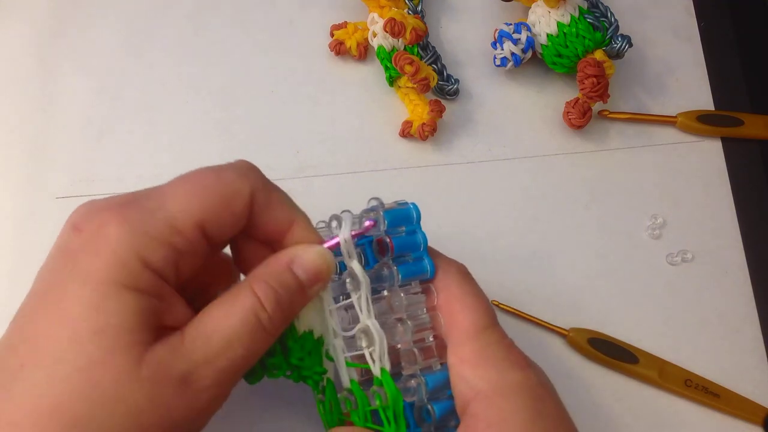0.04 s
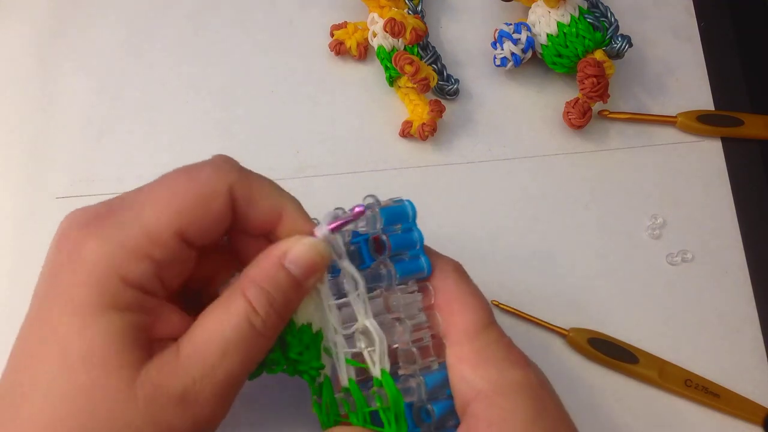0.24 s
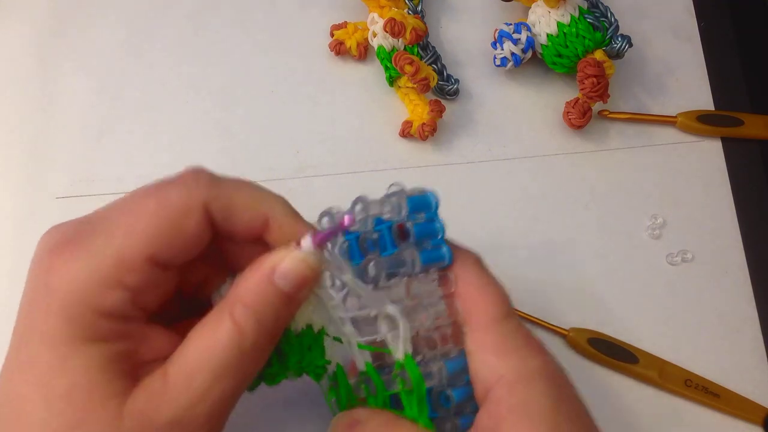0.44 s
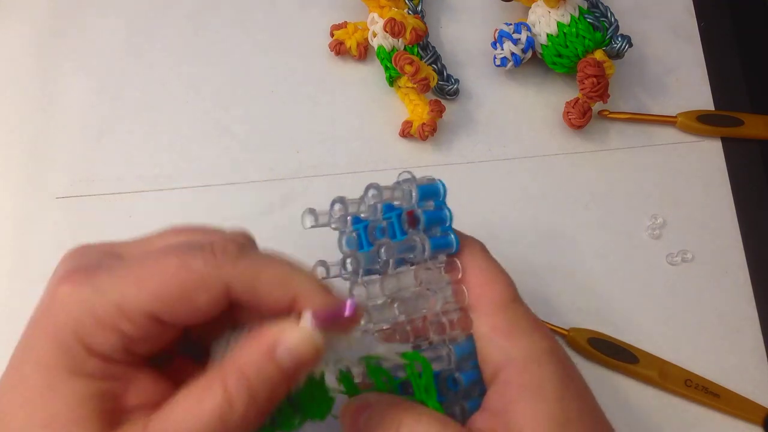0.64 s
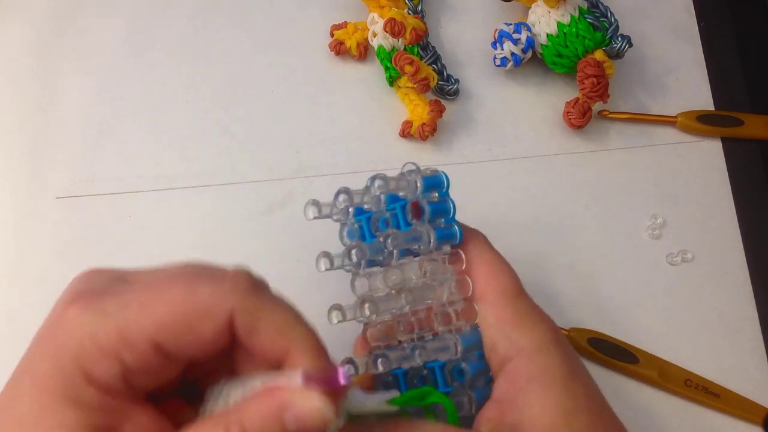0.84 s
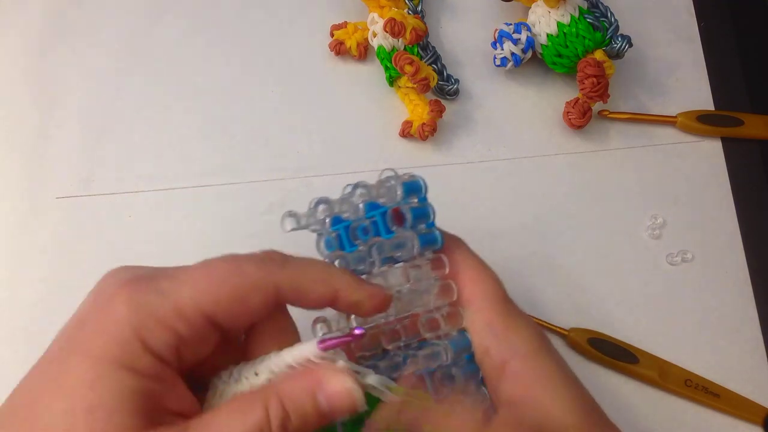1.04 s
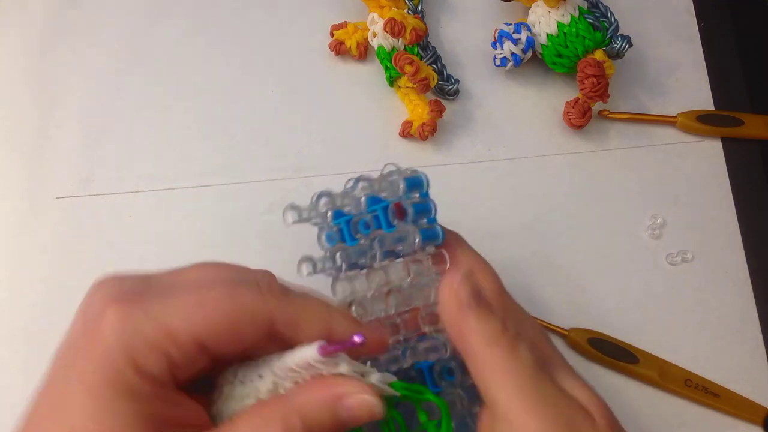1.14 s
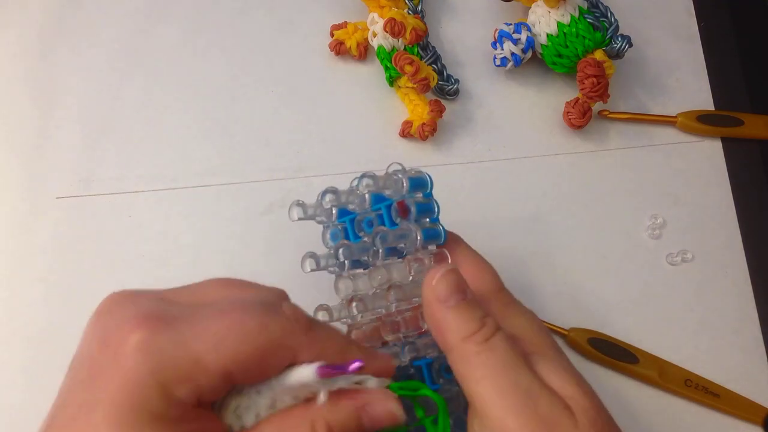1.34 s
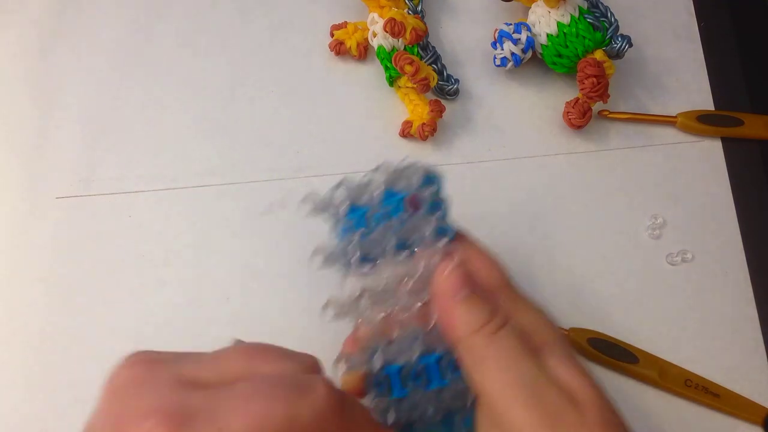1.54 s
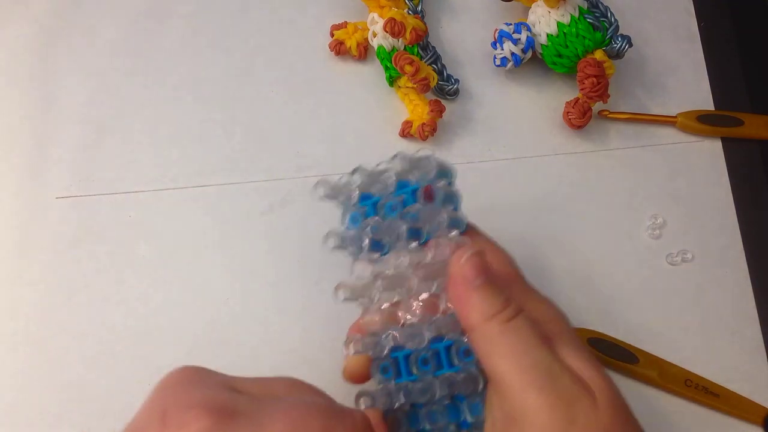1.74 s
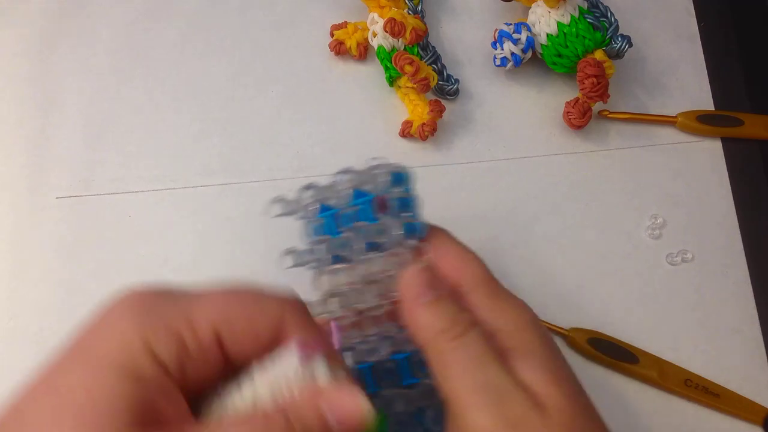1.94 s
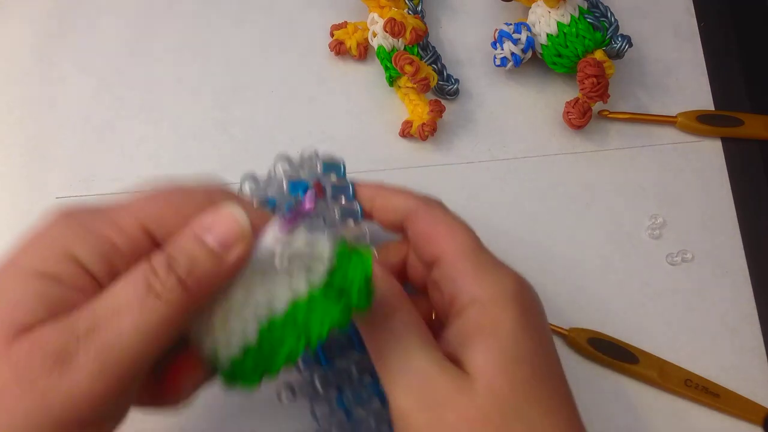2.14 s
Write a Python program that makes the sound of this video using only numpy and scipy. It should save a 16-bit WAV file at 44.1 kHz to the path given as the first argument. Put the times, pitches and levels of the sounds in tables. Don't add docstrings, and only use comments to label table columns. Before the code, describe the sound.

Rubber bands snap off plastic loom pegs in sharp clicking bursts, close up in a quiet room

```python
import sys
import numpy as np
from scipy import signal
from scipy.fft import rfft, irfft
from scipy.io import wavfile
from scipy.ndimage import uniform_filter1d

SR = 44100
rng = np.random.default_rng(int(sys.argv[2]) if len(sys.argv) > 2 else 0)


def inscribe(sig):
    pcm = np.round(np.clip(np.atleast_2d(sig).T, -1, 1) * 32767)
    wavfile.write(sys.argv[1], SR, pcm.astype(np.int16))


def how_loud(loudness_db):
    steps = np.asarray(loudness_db, float) / 20
    return 10 ** steps


N = 96623


def unit(x):
    return x / np.max(np.abs(x))


def level(x, db):
    return x * how_loud(db) / np.sqrt(np.mean(x ** 2))


def band(x, lo_hz, hi_hz):
    edges_hz = [lo_hz, min(hi_hz, 0.45 * SR)]
    return signal.sosfilt(signal.butter(2, edges_hz, "band", fs=SR, output="sos"), x)


def fade(t, t60):
    return np.exp(-np.log(1000) * t / t60)


def rise(t, rise_s):
    return 1 - np.exp(-t / rise_s)


def walk(rate_hz):
    k = int(SR / rate_hz)
    steps = np.repeat(rng.standard_normal(N // k + 1), k)
    sway = uniform_filter1d(uniform_filter1d(steps, k), k)[:N]
    return sway / sway.std()


def add(out, x, start_s):
    i = int(start_s * SR)
    out[i:i + len(x)] += x[:N - i]


def even(x):
    spectrum = rfft(x, 2 * len(x))
    return irfft(spectrum / uniform_filter1d(np.abs(spectrum), size=11))[:len(x)]


def hiss_and_rumble():
    # frequency in Hz, level in dB per Hz.
    floor = np.array([(15, -17), (25, -2), (126, 0.5), (240, -9.5), (509, -10), (804, -17), (945, -17),
                      (2230, -21), (15500, -24.5)])
    hz = np.fft.rfftfreq(N, 1 / SR)
    colour = how_loud(np.interp(np.log(hz + 1), np.log(floor[:, 0]), floor[:, 1], left=-60))
    noise = level(irfft(rfft(rng.standard_normal(N)) * colour, N), -60.5)
    rumble = band(noise, 9.6, 470)
    return noise + rumble * (how_loud(1.5 * walk(24)) - 1)


def whine():
    centre_hz, width_hz = 348.7, 10.8
    narrow = band(rng.standard_normal(N), centre_hz - width_hz / 2, centre_hz + width_hz / 2)
    return level(narrow, -71)


def rustle():
    # time in seconds, level in dB.
    shuffle = [
        (0, -71),
        (.45, -67),
        (.9, -64),
        (1.3, -70),
        (1.601, -69),
        (1.88, -69.5),
        (2.0, -59),
        (2.19, -61),
    ]
    rub = level(band(rng.standard_normal(N) ** 3, 1900, 9400), 0) * how_loud(2 * walk(65))
    return rub * how_loud(np.interp(np.arange(N) / SR, *np.array(shuffle).T))


def room(x):
    t = np.arange(SR // 3) / SR
    top_hz = 6500
    tail = 0
    for db, t60_s in [(-24, 0.35), (-21.5, 0.28)]:
        noise = rng.standard_normal(len(t))
        dulled = band(noise, 200, top_hz) + how_loud(-4) * band(noise, top_hz, 21000)
        part = dulled * rise(t, 0.0012) * fade(t, t60_s)
        tail = tail + how_loud(db) * part / np.linalg.norm(part)
    return signal.fftconvolve(x, tail)[:N]


def table_and_body():
    # start in seconds, peak in dB,
    # pitch in Hz, t60 in seconds.
    thumps = [(0.296, -34, 164, 0.051), (0.322, -36, 113, 0.037), (.336, -35, 118, 0.059),
              (0.359, -37, 103, 0.046), (0.383, -38.5, 132, 0.022), (.547, -46.5, 590, 0.056),
              (.571, -41, 568, 0.028), (0.653, -39, 596, 0.034), (.721, -39, 584, 0.024),
              (.843, -35.5, 486, 0.0096), (1.275, -52.5, 520, 0.012), (1.519, -33, 490, 0.0083),
              (1.52, -37.5, 247, 0.016), (.293, -47.5, 515, 0.018), (0.367, -38.5, 350, 0.036),
              (0.571, -29.5, 90, 0.051), (.574, -37, 191, 0.032), (0.723, -32.5, 89, 0.048),
              (.735, -44.5, 174, 0.14), (.795, -50, 159, 0.055), (0.844, -46.5, 156, 0.078),
              (.995, -51.5, 126, 0.11), (1.173, -46.5, 94, 0.035), (1.491, -46, 87.8, 0.23),
              (1.519, -42.5, 87.7, 0.073), (1.77, -43.5, 69.6, 0.028), (1.812, -46.5, 85, 0.044),
              (1.9551, -19, 97.5, 0.026), (1.9562, -28.5, 161, .018), (1.985, -43.5, 195, 0.022),
              (2.029, -42, 89, 0.029), (2.05, -49.5, 96, 0.045), (1.973, -38.5, 360, 0.023),
              (1.979, -35, 79, 0.071), (2, -31, 79.5, 0.05), (2.031, -47, 508, 0.037),
              (1.954, -41, 540, 0.04), (0.657, -43, 160, 0.15), (0.5706, -36.5, 357, 0.021),
              (.488, -50, 162, 0.07), (1.974, -35.5, 110, 0.036), (.362, -41, 526, 0.024),
              (1.998, -52, 480, 0.14)]
    sag, sag_s = 0.29, 0.0035
    out, t = np.zeros(N), np.arange(SR // 4) / SR
    for start, db, hz, t60 in thumps:
        grit = unit(band(rng.standard_normal(len(t)), 110, 428))
        low = hz < 300
        turns = hz * (t + low * sag * sag_s * rise(t, sag_s))
        body = (np.sin(2 * np.pi * turns) + how_loud(-20.5) * 3 * grit) * fade(t, t60)
        overtone = how_loud(-10) * np.sin(2 * np.pi * 1.6 * turns) * fade(t, t60 / 2)
        thump = (body + low * overtone) * rise(t, 0.005) ** (1 + low)
        add(out, how_loud(db) * unit(thump), start)
    return band(out, 30, 4400)


def clear_notes():
    # start in seconds, peak in dB, pitch in Hz, t60 in seconds.
    clear = [(0.5692, -37.5, 5870, 0.086), (.5709, -15, 5940, 0.0072), (0.571, -17.5, 6500, .006),
             (0.57, -30.5, 3093, 0.023), (.6538, -24.5, 3750, 0.012), (0.6548, -27.5, 4940, 0.0045),
             (.7225, -30.5, 3670, 0.012), (0.7233, -25, 4660, 0.0056), (.7915, -41, 3760, 0.0062),
             (.843, -30, 2390, 0.013), (.843, -32.5, 3800, 0.015), (1.1705, -43, 1920, 0.033),
             (2.0235, -35, 4100, 0.014), (1.483, -23, 4880, 0.015), (0.368, -57, 5860, 0.046),
             (.349, -35, 4350, 0.034), (.6538, -24.5, 2200, 0.011), (0.7237, -24.5, 2258, 0.006),
             (0.7211, -25, 1590, 0.017), (0.7226, -31, 1276, 0.041), (.7922, -30, 2040, 0.017),
             (0.843, -31, 1670, 0.017), (1.1075, -43.5, 1734, 0.027), (1.274, -53.5, 1010, 0.016),
             (1.2751, -48.5, 1400, 0.0073), (1.2737, -53.5, 1900, 0.015), (1.5195, -24, 2320, 0.0058),
             (1.7222, -43.5, 4090, 0.014), (1.7657, -40.5, 1660, 0.036), (1.7669, -27, 3930, 0.013),
             (1.806, -40, 2230, 0.019), (2.031, -44, 2060, 0.023), (2.1073, -32, 4030, 0.012),
             (1.494, -27.5, 3960, 0.034), (1.496, -27, 5340, 0.011)]
    out, t = np.zeros(N), np.arange(SR // 8) / SR
    for start, db, hz, t60 in clear:
        rough = unit(band(rng.standard_normal(len(t)), 0.985 * hz, 1.032 * hz))
        tone = np.sin(2 * np.pi * hz * t) + 3 * 0.13 * rough
        add(out, how_loud(db) * unit(tone * fade(t, t60) * rise(t, 0.00035) ** 2), start)
    return out


def ring(t, modes):
    scatter_db, detune = 2.5, 0.04
    total = np.zeros(len(t))
    for hz, db, t60 in modes:
        a, b = rng.standard_normal(2)
        total += how_loud(db + scatter_db * a) * np.sin(2 * np.pi * hz * (1 + detune * b) * t) * fade(t, t60)
    return total


def peg_ring(t, peg_hz):
    # frequency in Hz, level in dB, t60 in seconds.
    pegs = [(3155, -11, .008), (3750, -6, .01), (4300, -4, .01), (4900, -4, .01), (5400, -4, .01),
            (5870, -4, .014), (6300, -5, .01), (7000, -7, .008)]
    struck = how_loud(4) * np.sin(2 * np.pi * peg_hz * t) * fade(t, 0.011)
    return band(struck + ring(t, pegs), 3410, 7310)


def frame_ring(t):
    # frequency in Hz, level in dB, t60 in seconds.
    frame_modes = [(950, -22, .015), (1303, -14, .02), (1600, -5, .026), (1780, -2, .026), (2000, 0, .028),
                   (2280, 0, .028), (2500, -4, .02)]
    return band(ring(t, frame_modes) * fade(t, 0.17), 1370, 6000)


def air_crack(t):
    dying = fade(t, 0.0023)
    hiss = unit(band(rng.standard_normal(len(t)) * dying, 7000, 14140))
    return hiss + 0.3 * np.sin(2 * np.pi * 14200 * t) * dying


def rattle(t, peg_hz, peg_gain, frame_gain, air_gain):
    # low edge in Hz, high edge in Hz.
    rattle_bands = [
        (3400, 7200),
        (1600, 2550),
        (7200, 14500),
        (400, 1400),
    ]
    noise = rng.standard_normal(len(t))
    pegs, frame, air, body = [unit(band(noise, *edges_hz)) for edges_hz in rattle_bands]
    own = unit(band(rng.standard_normal(len(t)), 0.95 * peg_hz, 1.05 * peg_hz))
    mix = peg_gain * (pegs + how_loud(-32) * own)
    mix = mix + frame_gain * (frame + how_loud(1.5) * body)
    mix = mix + air_gain * how_loud(-2) * air * fade(t, 0.3)
    return how_loud(-5) * mix * fade(t, 0.078) * rise(t, 0.00051)


def knocks(events, flurry_s):
    out, t = np.zeros(N), np.arange(4096) / SR
    u = t[:512] / flurry_s
    for start, db, peg_hz, frame_db, air_db in events:
        hiss = rng.standard_normal(512)
        flurry = hiss * np.abs(hiss) * u ** 0.93 * np.exp(-u ** 1.58)
        crack = flurry * np.exp(-u ** 2 / 2)
        gains = how_loud(db + np.array([0, frame_db + 5.5, air_db + 3]))
        blows = (flurry, flurry, crack)
        rings = (peg_ring(t, peg_hz), frame_ring(t), air_crack(t))
        for gain, blow, part in zip(gains, blows, rings):
            add(out, gain * unit(signal.fftconvolve(even(blow), part)), start)
        add(out, rattle(t, peg_hz, *gains), start)
    return out


def hook_taps():
    # start in seconds, peak in dB, peg ring in Hz, frame share in dB, air share in dB.
    taps = [(1.1083, -45.5, 3800, -6.5, -12), (1.1695, -35.5, 4640, -7.5, -51),
            (1.2745, -59, 4130, -2, -54), (1.3379, -37, 5500, -21.5, -44), (1.3803, -46, 5800, -26, -21),
            (1.7218, -51, 4400, -7, -27), (1.7303, -44, 5330, -9, -37), (1.733, -35.5, 4270, -15.5, -37),
            (1.7653, -29, 5730, -14.5, -17), (1.8055, -38, 4400, -4.5, -22),
            (1.8077, -35.5, 4460, -15, -16), (1.9051, -47.5, 5950, -16, -31),
            (1.925, -53.5, 3940, -2.5, -22), (1.9475, -33, 5300, -16.5, -8.5),
            (1.9813, -47, 5740, -4.5, -17), (2.0226, -25.5, 5500, -59, -48), (2.0305, -42, 4080, -6, -1),
            (2.106, -32.5, 4460, -19, -29)]
    return knocks(taps, 0.0012)


def band_snaps():
    # start in seconds, peak in dB, peg ring in Hz, frame share in dB, air share in dB.
    snaps = [(0.5237, -33, 6060, -15.5, -7.5), (0.5472, -44.5, 6000, -7, -1), (.5622, -36, 5840, -6.5, -4),
             (0.5637, -29, 6000, -10, -1.5), (0.5703, -24, 7200, -15, -1.5),
             (.574, -22.5, 5900, -10.5, -18), (0.6248, -42, 5510, -12, -7), (0.6532, -17.5, 5200, -15, -13),
             (0.6664, -38.5, 5870, -0.5, -4), (0.7108, -38, 4370, -5, -26), (0.7204, -17, 6330, -10.5, -15),
             (.7225, -17, 5420, -16.5, -4.5), (0.7246, -22.5, 5500, -15, -6),
             (0.7914, -26.5, 4900, -13, -3), (0.8072, -51, 4100, 0.5, -4), (0.8424, -23, 5440, -13, -3),
             (0.8982, -50, 4900, -11, -29), (0.9092, -30.5, 5320, -16.5, -52),
             (1.4699, -29, 4800, -15.5, -14), (1.4815, -30, 5950, -20, -14),
             (1.4831, -18.5, 5600, -24.5, -12.5), (1.4855, -26, 5100, -17, -14),
             (1.4907, -31.5, 5850, -7, -8), (1.4951, -25, 3870, -21, -11), (1.498, -32, 5600, -9.5, -17),
             (1.5187, -23.5, 5670, -12.5, -9.5), (1.5194, -21.5, 4200, -17.5, -13.5)]
    return knocks(snaps, 0.0012)


def band_rip():
    # start in seconds, peak in dB, peg ring in Hz, frame share in dB, air share in dB.
    rip = [(0.2912, -32.5, 7400, -21, -15), (0.2921, -23, 4490, -16.5, 5), (0.2945, -30.5, 6500, -11.5, -5),
           (0.2973, -18.5, 6560, -18.5, -31), (0.3019, -27.5, 5830, -14, -29), (0.3175, -24, 6380, -14, -5),
           (.319, -28.5, 6200, -25, -24), (0.3309, -23.5, 5940, -14, 0), (0.3477, -26.5, 6800, -11.5, -6),
           (.3515, -27.5, 4250, -2, -15), (0.3566, -25.5, 6350, -15, 2), (0.3635, -20, 4000, -25, -13),
           (.366, -30, 4900, -11, -13), (0.3693, -17.5, 5900, -15.5, -19), (.372, -36.5, 5800, -14, -0.5)]
    return knocks(rip, 0.00088)


def scene():
    loom = band_rip() + band_snaps() + hook_taps() + clear_notes()
    background = hiss_and_rumble() + whine() + rustle()
    return (loom + room(loom) + table_and_body() + background)[None]


def band_limit(x):
    return signal.sosfilt(signal.butter(12, 16490, fs=SR, output="sos"), x)


def record(dry):
    cut = signal.sosfilt(signal.cheby1(10, 0.3, 15300, fs=SR, output="sos"), dry)
    return band_limit(cut)


dry = scene()
out = record(dry)
inscribe(out)
```